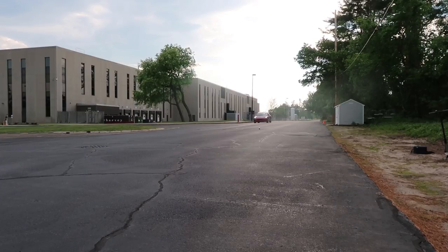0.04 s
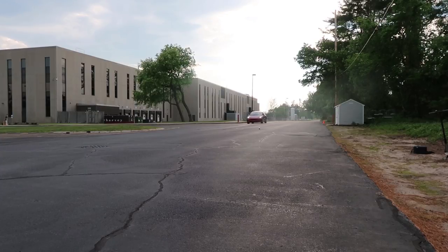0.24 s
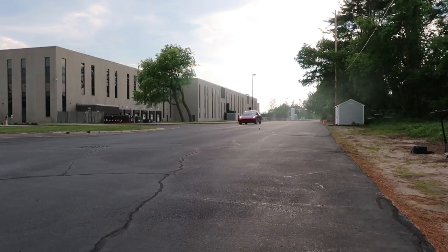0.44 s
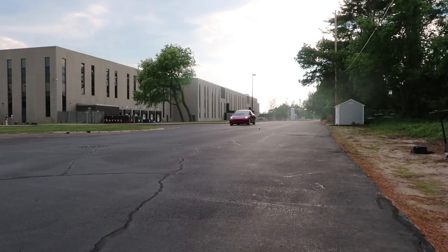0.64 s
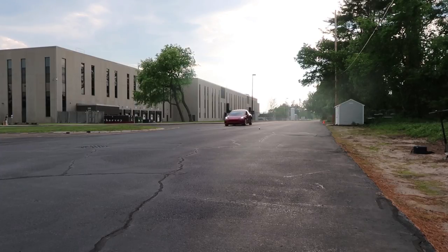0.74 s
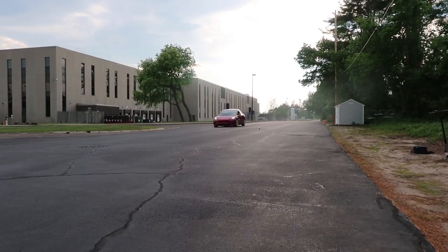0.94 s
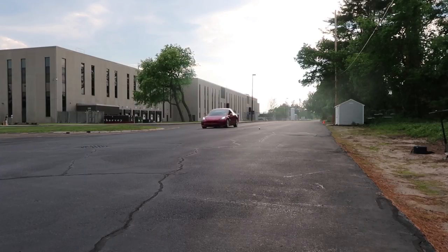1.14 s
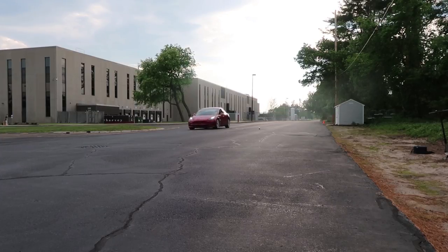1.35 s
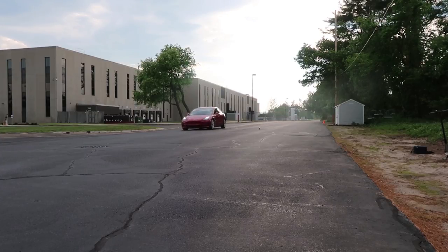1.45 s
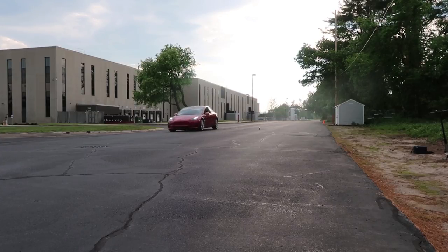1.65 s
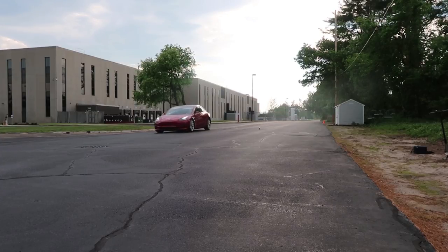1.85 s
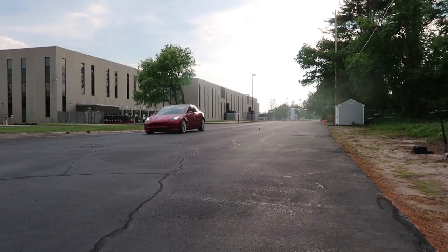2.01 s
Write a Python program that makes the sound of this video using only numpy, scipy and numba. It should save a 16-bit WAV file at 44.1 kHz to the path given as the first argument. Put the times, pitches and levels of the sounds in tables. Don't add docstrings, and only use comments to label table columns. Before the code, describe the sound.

Stuttering tyre screech near one kilohertz from a hard-braking car, over low rolling road roar

```python
import sys
import numpy as np
from scipy import signal
from scipy.fft import rfft, irfft, next_fast_len
from scipy.io import wavfile
from scipy.ndimage import uniform_filter1d
from numba import njit

SR = 44100
rng = np.random.default_rng(int(sys.argv[2]) if len(sys.argv) > 2 else 0)


def invert_db(level):
    return 10 ** (np.asarray(level, dtype=float) / 20)


def log_audio(samples):
    frames = np.atleast_2d(samples).T
    limited = np.clip(frames, -1, 1)
    pcm = np.round(limited * 32767).astype(np.int16)
    wavfile.write(sys.argv[1], SR, pcm)


N = 91595
T = np.arange(N) / SR


@njit
def svf(x, hz, width):
    y, band, low = np.empty(len(x)), 0., 0.
    g, k = np.tan(np.pi * hz / SR), width / hz
    for i in range(len(x)):
        v = (band + g * (x[i] - low)) / (1 + g * (g + k))
        band, low, y[i] = 2 * v - band, low + 2 * g * v, k * v
    return y


def resonate(x, hz, width, times):
    for _ in range(times):
        x = svf(x, hz, width)
    return x


def unit(x):
    return x / np.sqrt(np.mean(x ** 2))


def walk(rate):
    hold = int(SR / rate)
    steps = np.repeat(rng.standard_normal(N // hold + 1), hold)
    return 1.3 * uniform_filter1d(uniform_filter1d(steps, hold), hold)[:N]


def shape(table, hz):
    points = np.array(table)
    return np.interp(np.log(hz), np.log(points[:, 0]), points[:, 1])


def bands(table, low_hz, count, flicker_db):
    for hz in low_hz * 2 ** (np.arange(count) / 2):
        level = invert_db(shape(table, hz) + flicker_db * walk(14.18))
        yield hz, level * resonate(rng.standard_normal(N), hz, hz / 2, 2)


def hump(at, length):
    return np.exp(-np.abs(2 * (T - at) / length) ** 3)


# time_s, level_db
SLIP_LEVELS = [(0.0, -70.5), (0.51, -52.5), (0.61, -30), (0.64, -41), (0.82, -28), (0.86, -39),
               (1.02, -30.5), (1.09, -39), (1.12, -29), (1.19, -36.5), (1.41, -33.5), (1.52, -40.5),
               (1.57, -34.5), (1.65, -37), (1.87, -34.5), (1.99, -62), (2.03, -38), (2.07, -54.5)]


def slip_level():
    return np.interp(T, *np.array(SLIP_LEVELS).T)


# pitch_hz, density_db_per_hz
ROAR_SPECTRUM = [(15, -37), (25, -11.5), (129, -5), (201, -8.5), (236, -4), (447, -8), (920, -11),
                 (1350, -10), (3000, -29), (3900, -58), (6600, -120)]


def road_roar(slip_db):
    level_db, rise_db_per_s, bass_rise_db_per_s = -37.5, -0.5, 4
    parts = list(bands(ROAR_SPECTRUM, 29.45, count=14, flicker_db=2.35))
    loudness = np.sqrt(np.mean(sum(band for _, band in parts) ** 2))
    roar = 0
    for hz, band in parts:
        rise = bass_rise_db_per_s if hz < 150 else rise_db_per_s
        roar = roar + band * invert_db(level_db + rise * T)
    return roar / loudness * invert_db(0.17 * (uniform_filter1d(slip_db, size=6000) + 56))


def tread_chatter(loud, slip_db):
    tread_hz, tread_width_hz = 1052.3, 79.3
    brake_s, bite_s, coast_db = .66, .2, -15.5
    chatter = unit(resonate(rng.standard_normal(N), tread_hz, 1.86 * tread_width_hz, 3))
    chatter = chatter * invert_db(-22 + .4 * (slip_db + 40.5) + 1.5 * walk(25))
    coasting = np.clip((brake_s - T) / bite_s, 0, 1)
    chatter = chatter * invert_db(-5 * (T - 1) + coast_db * coasting)
    return chatter / (1 + loud / .15)


# pitch_hz, width_hz, level_db, change_db_per_s
RUBBER_RESONANCES = [(1020, 200, 0, 0), (1480, 300, -8, -1), (2280, 380, 0, -4), (3350, 500, -11, 0)]


def rubber_scrub(scrub_db):
    rubber = 0
    for hz, width, db, fade in RUBBER_RESONANCES:
        body = unit(resonate(rng.standard_normal(N), hz, width, 2))
        rubber = rubber + body * invert_db(db + fade * (T + 0.5) + 3 * walk(30))
    return rubber * invert_db(scrub_db)


# pitch_hz, density_db_per_hz
HISS_SPECTRUM = [(2100, 0), (2970, -9.5), (4200, -12.5), (5940, -28), (8400, -50), (11900, -66.5)]


def tyre_hiss(scrub_db):
    hiss = 0
    for hz, band in bands(HISS_SPECTRUM, 2100., count=6, flicker_db=0.5):
        bend = np.log2(hz / 2000) ** 1.3
        hiss = hiss + band * invert_db(5.5 * (T - 1.5) * bend)
    sliding = invert_db(4 - 41.5 + .7 * (scrub_db + 33.5))
    rolling = invert_db(-49 + 3.5 * (T - 1))
    return unit(hiss) * np.hypot(sliding, rolling)


# start_s, level_db
STONE_KNOCKS = [
    (0.104, -31),
    (0.552, -25),
    (0.799, -32.5),
    (1.58, -27),
]


def stone_knocks():
    t60_s = .012
    level = sum((T >= at) * invert_db(db + 9.5 - 60 * np.abs(T - at) / t60_s) for at, db in STONE_KNOCKS)
    return resonate(rng.standard_normal(N) * level, 1500., 2500., 3)


# centre_s, length_s, level_db, pitch_hz
SINGING_SLIPS = [(0.399, .012, -30, 1100), (0.579, 0.014, -18.5, 1062), (.597, 0.018, -18, 1097),
                 (0.615, 0.024, -18, 1070), (0.688, 0.044, -19, 1023), (0.733, .055, -12, 1048),
                 (0.772, 0.032, -12, 1038), (.799, 0.013, -10, 1063), (.824, .03, -7.5, 1007),
                 (0.847, 0.013, -11, 1047), (0.982, .06, -11.5, 1050), (1.017, 0.02, -18, 1014),
                 (1.121, .04, -19, 1105), (1.148, .018, -11, 1017), (1.168, 0.014, -11, 1039),
                 (1.213, 0.038, -17.5, 1055), (1.28, .08, -10.5, 1080), (1.332, 0.047, -8.5, 1051),
                 (1.388, 0.073, -8.5, 1059), (1.452, 0.041, -10.5, 1052), (1.486, 0.027, -14.5, 1051),
                 (1.52, .04, -17, 1087), (1.567, 0.05, -10.5, 1043), (1.624, 0.018, -20, 1020),
                 (1.721, .05, -17.5, 1097), (1.763, .045, -10.5, 1049), (1.841, 0.043, -23, 1109),
                 (1.877, .022, -8, 1035), (1.893, 0.021, -9.5, 1054), (2.037, 0.01, -10, 1121)]
# centre_s, length_s, level_db, pitch_hz
FAR_WHISTLES = [
    (.735, .055, -30, 1220),
    (.715, .03, -33, 915),
    (.965, .03, -33, 1340),
    (1.12, .03, -33, 1240),
    (1.75, .06, -27, 1250),
    (1.01, .03, -33, 2300),
    (.81, .03, -32, 2330),
    (1.125, .03, -35, 2280),
]
# multiple, level_db at full swing
SQUEAL_OVERTONES = [(2, -12.5), (3, -32.5), (4, -39)]


def squeal():
    sag_hz_per_s, wobble_hz, flutter_db = 220, 11, 1.5
    size, pitch = [], []
    for at, length, db, hz in SINGING_SLIPS:
        size.append(invert_db(db) * hump(at, length))
        pitch.append(hz - sag_hz_per_s * np.clip(T - at, -length, length))
    power = (np.array(size) + 1e-9) ** 2
    loud = np.sqrt(power.sum(axis=0))
    hz = (power * np.array(pitch)).sum(axis=0) / power.sum(axis=0) + wobble_hz * walk(110)
    phase = 2 * np.pi * np.cumsum(hz) / SR
    note = np.sin(phase) * invert_db(flutter_db * walk(70))
    for k, db in SQUEAL_OVERTONES:
        note = note + loud * invert_db(db + 2.5 * walk(60)) * np.sin(k * phase + .5 * walk(200))
    for at, length, db, whistle_hz in FAR_WHISTLES:
        whistle = np.sin(2 * np.pi * whistle_hz * T + 0.27 * walk(40))
        note = note + invert_db(db) * hump(at, length) * whistle / loud
    return np.sqrt(2) * loud * note, loud


# start_s, level_db, pitch_hz, t60_s
BODY_THUDS = [
    (0.549, -10.5, 600, 0.0097),
    (.66, -33, 105.8, .08),
    (0.792, -18, 89.4, 0.054),
    (1.142, -20.5, 210, 0.043),
    (1.69, -28, 80, .08),
    (1.762, -26, 105, .08),
    (1.8, -37.5, 89.9, 0.073),
    (1.871, -19.5, 72.7, .1),
    (1.94, -36.5, 69.2, 0.14),
]


def body_thuds():
    thuds = 0
    for at, db, hz, t60 in BODY_THUDS:
        age = np.maximum(T - at, 0)
        swell = np.minimum(age * hz * 2, 1)
        ring = np.sin(2 * np.pi * hz * age) * invert_db(-60 * age / t60)
        thuds = thuds + invert_db(db) * (T >= at) * ring * swell
    return thuds


def wall_echo(car):
    first_s, t60_s, level_db = .03, .25, -25
    age = np.arange(SR // 3) / SR
    tail = rng.standard_normal(len(age)) * invert_db(-60 * age / t60_s) * (age > first_s)
    tail = unit(tail) / np.sqrt(len(age))
    return invert_db(level_db) * signal.fftconvolve(car, tail)[:N]


# pitch_hz, width_hz, depth_0_to_1
ECHO_DIPS = [(420, 120, .6), (1760, 300, .6), (2650, 200, .5), (3050, 220, .7), (3800, 350, .5),
             (4560, 280, .78), (5200, 380, .7), (6020, 330, .7), (6950, 350, .3)]


def near_echoes(mid):
    comb_hz, comb_from_hz, comb_share = 766, 7400, .5
    for hz, width, depth in ECHO_DIPS:
        mid = mid - np.clip(depth, 0, 1) * svf(mid, hz, width)
    size = next_fast_len(N + SR // 4)
    hz = np.maximum(np.fft.rfftfreq(size, 1 / SR), 20)
    share = comb_share / (1 + (comb_from_hz / hz) ** 16)
    comb = 1 - share * np.exp(-2j * np.pi * hz / comb_hz)
    return irfft(rfft(mid, size) * comb, size)[:N]


# pitch_hz, side_over_mid_db
SIDE_SPECTRUM = [(60, -26), (250, -27), (1000, -34), (2250, -20), (4100, -13), (7500, -9), (13700, -8)]


def two_ports(mid):
    size = next_fast_len(N + SR // 4)
    hz = np.maximum(np.fft.rfftfreq(size, 1 / SR), 20)
    smear = unit(rng.standard_normal(4096) * np.exp(-np.arange(4096) / 700)) / 64
    blurred = signal.fftconvolve(mid, smear)[:N]
    side = irfft(rfft(blurred, size) * invert_db(shape(SIDE_SPECTRUM, hz)), size)[:N]
    pan = invert_db(.45 * (T - 1.25) / 2)
    return np.array([(mid + side) * pan, (mid - side) / pan])


def scene():
    slip_db = slip_level()
    note, loud = squeal()
    scrub_db = slip_db + 4 * (loud / .3 - .5)
    tyres = note + tread_chatter(loud, slip_db) + rubber_scrub(scrub_db) + tyre_hiss(scrub_db)
    road = road_roar(slip_db) + stone_knocks() + body_thuds()
    return two_ports(near_echoes(tyres + wall_echo(tyres) + road))


def band_limit(x):
    return signal.sosfilt(signal.butter(12, 14340, fs=SR, output="sos"), x)


def record(dry):
    low_cut = signal.butter(2, 42, "high", fs=SR, output="sos")
    high_cut = signal.butter(1, 9000, fs=SR, output="sos")
    mix = signal.sosfilt(np.vstack([low_cut, high_cut]), dry)
    return band_limit(mix)


dry = scene()
out = record(dry)
log_audio(out)
```